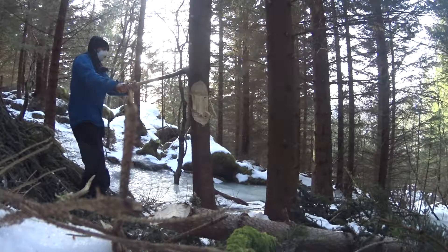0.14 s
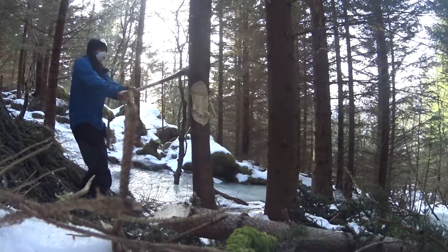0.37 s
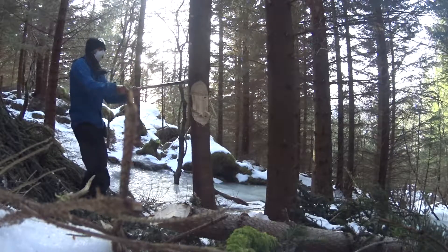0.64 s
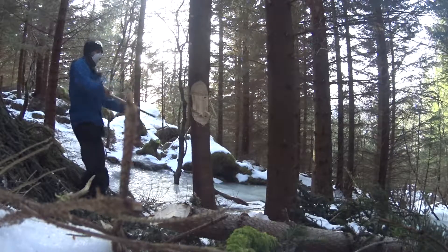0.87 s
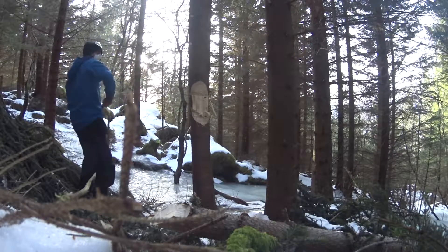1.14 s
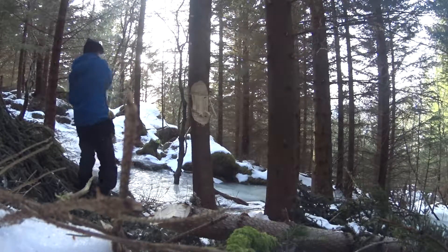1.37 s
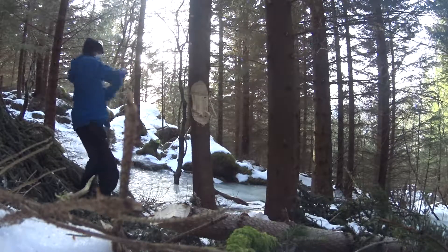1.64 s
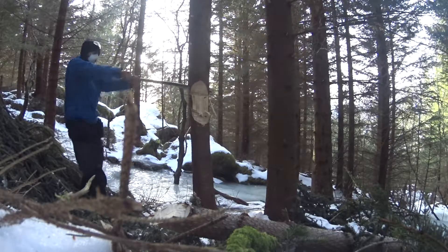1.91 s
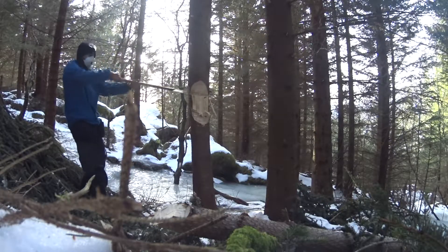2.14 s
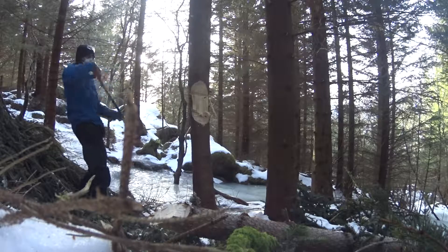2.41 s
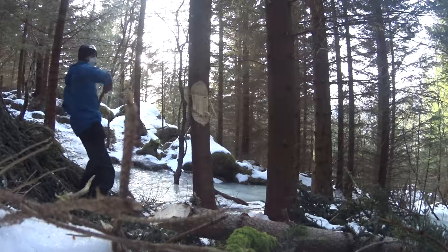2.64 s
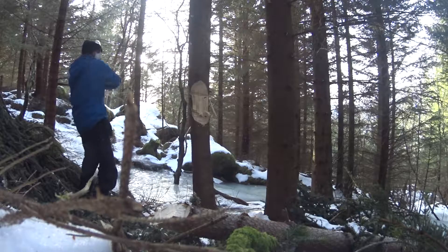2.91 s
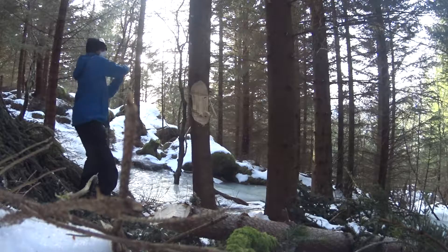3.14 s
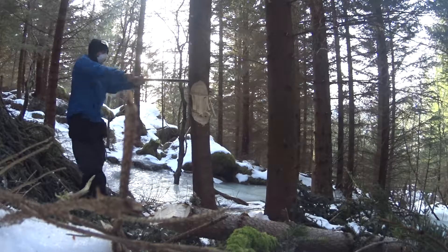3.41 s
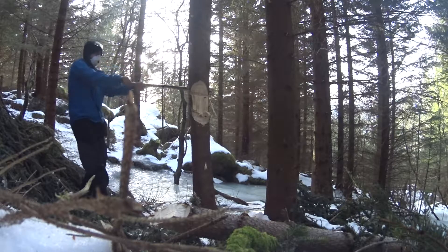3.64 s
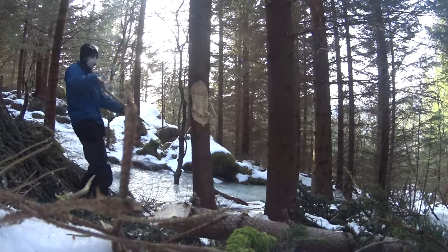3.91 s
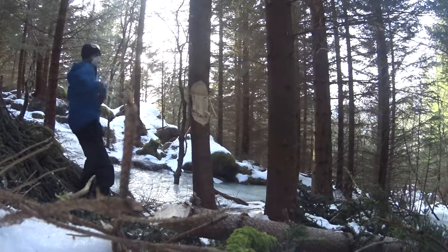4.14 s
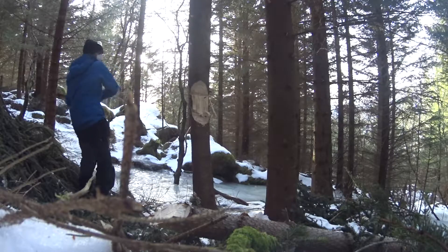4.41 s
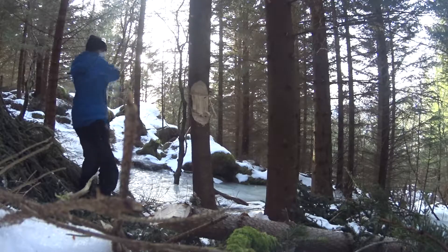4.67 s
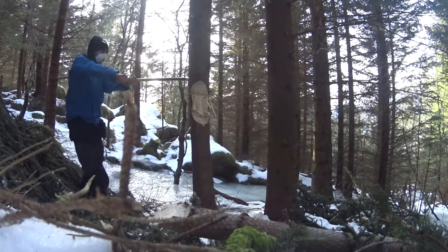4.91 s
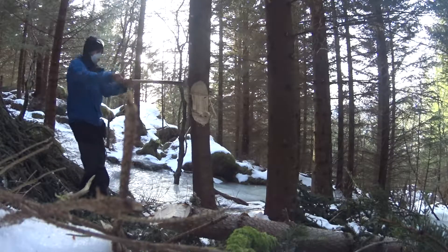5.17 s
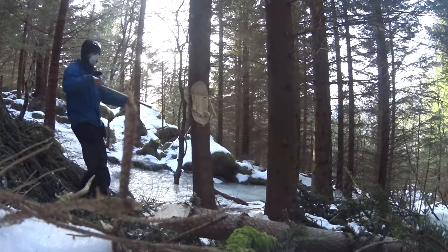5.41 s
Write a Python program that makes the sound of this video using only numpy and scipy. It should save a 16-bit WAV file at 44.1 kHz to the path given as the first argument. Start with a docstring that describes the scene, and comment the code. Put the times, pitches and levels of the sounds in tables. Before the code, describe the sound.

In a quiet forest, the tail of an earlier axe blow fades. Then three loud, sharp chops hit a standing trunk about one and a half seconds apart, each a bright crack with a short, low woody knock and a quick scattered echo. Between them a stiff jacket rustles faintly and small twigs tick. Steady soft microphone hiss runs underneath, in stereo.

```python
"""The echo of an earlier axe blow dies away in a still forest, over steady microphone hiss.
A jacket rustles in small grains of noise; twigs and chips tick, each a short burst of noise.
Then the axe bites into a standing spruce three times, at about 1.8, 3.4 and 4.9 s, with rustles and ticks between.
Each blow is a noise crack of splitting fibres, then a trunk knock of fading sine waves.
The nearest trunks return copies of the crack, and the forest answers with fading noise."""
import sys
import numpy as np
from scipy import signal
from scipy.fft import rfft, irfft
from scipy.io import wavfile

SR = 44100
rng = np.random.default_rng(int(sys.argv[2]) if len(sys.argv) > 2 else 0)


def voltage_ratio(level):
    """Linear amplitude factor for a level in decibels (scalar or array-like)."""
    return 10 ** (np.asarray(level, float) / 20)


def waveform_to_disk(signal):
    """Save audio, clipped to [-1, 1], as 16-bit WAV at the path in sys.argv[1]."""
    frames = np.transpose(np.atleast_2d(signal))
    scaled = np.clip(frames, -1, 1) * 32767
    samples = np.round(scaled).astype(np.int16)
    wavfile.write(sys.argv[1], SR, samples)


N = 244314   # length in samples

# axe blows: start_s, crack_db, brightest_hz, knock_db, knock_tilt_db_per_octave
BLOWS = [(-.25, 13, 4450, -29, 0), (1.84, 10.5, 3440, -29.5, 3.5), (3.3857, 9, 5100, -32.5, -0.5),
         (4.9402, 8, 8400, -30, 2)]
# colour of splitting fibres: pitch_hz, level_db (per Hz)
CRACK_COLOUR = [(350, -60.5), (650, -9.5), (1000, -22), (1400, 1.5), (2000, 2), (2500, 4), (3000, 6),
                (5400, -0.5), (6600, 0), (9500, -6.5), (11000, -3.5), (14500, -3.5)]
# ringing tones of the trunk: pitch_hz, level_db, fade_by_60_db_s
TRUNK_TONES = [(116.5, -2.5, 0.14), (176, -8.5, 0.08), (257.8, 0.5, 0.11), (343.5, -1.5, 0.06),
               (398, 5, 0.06), (460, 10, 0.036), (561, -4, 0.072), (690, -15, 0.044)]
# single echoes off the nearest trunks: delay_s, level_db, left_minus_right_db
NEAR_TRUNKS = [(0.0141, -11.5, -0.5), (0.0236, -25, 2), (.037, -20.5, 1), (0.053, -26.5, 3),
               (0.074, -35.5, -12)]
# colour of the forest echo: pitch_hz, level_db (per Hz)
FOREST_COLOUR = [(35, -47.5), (60, -5), (103, -5.5), (199, -4.5), (391, -11), (497, -16), (543, -16.5),
                 (957, -21.5), (1920, -0.5), (2500, -4), (2910, -4.5), (5600, -5), (10300, -11),
                 (11000, -7), (14300, -48), (22000, -120)]
# how long the forest echo takes to fall by 60 dB: pitch_hz, fade_s
FOREST_FADE = [(60, 0.54), (200, 0.23), (600, 0.66), (1050, 0.56), (1600, 0.5), (2100, 0.43), (2700, 0.5),
               (6000, 0.43), (11000, 0.37)]
# how alike left and right are in the forest echo: pitch_hz, likeness (1 = same, 0 = unrelated)
FOREST_LIKENESS = [(60, 0.66), (500, 0.91), (950, 0.23), (1600, 0.53), (3500, 1), (4100, .3), (5100, 0.76),
                   (6400, 0.12), (11000, 0.29)]
# moves of the jacket: middle_s, half_length_s, level_db, high_hiss_against_rustle_db
RUBS = [(0, .04, -63, -24), (0.388, 0.014, -66.5, -1.5), (0.704, 0.3, -66.5, -6.5),
        (0.98, 0.082, -58.5, -13), (1.174, 0.14, -57, -9.5), (1.434, 0.11, -60.5, -6.5),
        (1.755, 0.28, -62.5, -10), (2.2, 0.43, -67.5, -6.5), (2.448, 0.055, -61, -10.5),
        (2.556, 0.086, -53.5, -9.5), (2.677, 0.079, -60, -13), (2.978, 0.074, -61, -2),
        (3.085, 0.067, -58.5, -4.5), (3.314, 0.19, -63, -6), (3.662, 0.25, -68, -7.5),
        (3.844, 0.064, -63, -8), (4.043, 0.2, -62.5, -10.5), (4.237, 0.14, -60, -8),
        (4.397, 0.019, -59.5, -5), (4.488, 0.08, -63.5, -9), (4.622, 0.073, -65.5, -8.5),
        (4.886, 0.2, -64, -11), (5.22, 0.21, -66, -6), (5.54, 0.13, -60.5, -10)]
# colour of the cloth: pitch_hz, level_db (per Hz)
RUSTLE_COLOUR = [(530, -41), (900, -24), (1540, -8.5), (1820, -27), (2120, -5), (2590, -5.5), (3780, -2.5),
                 (5570, -1.5), (6650, -3), (10200, -9), (11000, -8), (14300, -61), (22000, -120)]
# colour of the microphone hiss: pitch_hz, level_db (per Hz)
HISS_COLOUR = [(12, -42), (20, -6.5), (64, -10), (145, -8), (174, -6.5), (288, -3.5), (439, -3),
               (514, -2.5), (995, -3), (1560, -6), (2940, -10), (3630, -10.5), (11000, -16.5), (14300, -54),
               (22000, -120)]
# how alike left and right are in the hiss: pitch_hz, likeness (-1 = opposite, 1 = same)
HISS_LIKENESS = [(60, 0.97), (130, 0.58), (270, -0.17), (600, -0.57), (1400, -0.68), (2300, 0.13),
                 (3300, 0.77), (4300, -0.84), (5500, 0.68), (7200, -0.95), (11000, 0.25)]
# ticks of twigs and chips: start_s, peak_db, pitch_hz, length_s, wide_snap_share (0 to 1)
TICKS = [(0.493, -45, 7200, .001, .5), (0.516, -34, 5560, 0.0023, 0.88), (0.671, -53, 3500, 0.0074, .01),
         (0.713, -30.5, 4200, 0.0014, 0.74), (0.858, -39.5, 9900, 0.0016, 0.74),
         (2.2, -36.5, 3900, 0.001, 0.6), (2.2214, -56, 5500, .001, .4), (2.289, -36, 7460, 0.0014, 0.92),
         (2.363, -39, 5540, 0.0015, 0.88), (2.796, -24.5, 6000, 0.00025, 0.68),
         (2.8215, -45.5, 5400, 0.00044, .1), (2.965, -37.5, 10500, 0.0034, .05),
         (2.975, -36.5, 10540, 0.0029, .1), (3.0589, -47, 5600, 0.00099, .4),
         (3.0617, -20.5, 5300, 0.00051, 0.54), (3.074, -31.5, 5900, 0.0014, .2),
         (3.1055, -26.5, 10300, 0.00084, 0.32), (3.24, -56.5, 1820, 0.002, .05),
         (3.373, -30, 5600, 0.0011, 0.8), (3.69, -36.5, 3530, 0.0022, .12),
         (4.229, -41, 6000, 0.00048, 0.44), (4.387, -46, 5570, 0.0008, .4),
         (4.4576, -19.5, 4600, 0.00054, 0.51), (4.4632, -34, 5500, 0.00072, 0.76),
         (4.468, -34, 5500, 0.0016, 0.83), (4.861, -38, 5100, 0.0006, 0.43),
         (5.237, -46.5, 4550, 0.00083, 0.48), (5.241, -39, 4500, 0.00091, 0.77)]
# the two ports resonate differently: pitch_hz, left_minus_right_db (before its share is taken)
PORT_BALANCE = [(700, 1), (1900, 0.5), (2250, 14.5), (2600, -4), (3100, 4), (3750, -15), (4500, -2),
                (5800, -7), (6400, -6.5), (7000, 8), (7600, -7), (9100, 6.5), (10000, -15.5), (10800, 1)]
# the ports also differ in phase: pitch_hz, left_lead_radians
PORT_PHASE = [(100, 0.5), (700, 0.1), (1050, -0.2), (1700, 1.1), (2350, -3), (2900, -1.52), (3650, -2.5),
              (4200, -5), (5000, -5.5), (6100, -5.5), (6700, -4.5), (7600, -5.5), (9000, -5.5), (10500, -5)]
# cut of the highest sounds: pitch_hz, gain_db
TOP_CUT = [(10980, 1), (11120, -23), (11600, -24.5), (14000, -67), (15000, -81)]

LEAD = SR // 2   # samples kept before the start, room for the earlier blow
RISE_S, RISE_AT_HZ, RISE_LAW = .0012, 4500, 0.2   # a brighter blow cracks faster
ECHO_DB = -6   # forest answer against the crack
CONTACT_HZ = 680   # the soft wood spreads the push over a millisecond or so
RUB_EDGE = 2.3   # how squarely a rub swells and fades
RESTING_DB = -86   # the cloth at rest
HIGH_HISS_HZ, HIGH_HISS_WIDTH_HZ = 10300, 2200   # thin high part of the cloth sound
HISS_DB = -61   # microphone hiss


def rms_one(x):
    """Scale to an average strength (rms) of 1."""
    return x / np.sqrt(np.mean(x ** 2) + 1e-20)


def at_hz(points, hz):
    """Read a (pitch, value) table in between its points, on a log pitch axis."""
    table = np.array(points)
    return np.interp(np.log(hz + 1), np.log(table[:, 0]), table[:, 1])


def colour(x, points):
    """Filter with the gains of a (pitch_hz, gain_db) table, responding as early as it can (minimum phase)."""
    gain = voltage_ratio(at_hz(points, np.fft.rfftfreq(4096, 1 / SR)))
    cepstrum = irfft(np.log(gain))
    # fold the second half onto the first, so nothing sounds ahead of its cause
    cepstrum[1:2048] *= 2
    cepstrum[2049:] = 0
    response = irfft(np.exp(rfft(cepstrum)))
    return signal.oaconvolve(x, response)[:len(x)]


def resonance(x, hz, width_hz):
    """Let through one band, like something that rings at one pitch; gain about 1 at its peak."""
    r = np.exp(-np.pi * width_hz / SR)
    top = [(1 - r * r) / 2, 0, (r * r - 1) / 2]
    bottom = [1, -2 * r * np.cos(2 * np.pi * hz / SR), r * r]
    return signal.lfilter(top, bottom, x)


def stereo_noise(size, spectrum, likeness):
    """Spectrum of left and right noise whose likeness depends on pitch, and its frequencies."""
    hz = np.fft.rfftfreq(size, 1 / SR)
    mid, side = rfft(rng.standard_normal((2, size)))
    alike = np.clip(at_hz(likeness, hz), -.99, .99)
    pair = np.sqrt(1 + alike) * mid + np.sqrt(1 - alike) * side * [[1], [-1]]
    return voltage_ratio(at_hz(spectrum, hz)) * pair, hz


def drift(rate_hz, size):
    """Slow random wandering of rms 1, made by smoothing noise twice."""
    r = np.exp(-2 * np.pi * rate_hz / SR)
    wander = signal.lfilter([1], [1, -2 * r, r * r], rng.standard_normal(size + 4000))
    return rms_one(wander[4000:])   # leave out the settling


def near_echoes(x):
    """The nearest trunks each return one delayed copy, louder on one side."""
    out = x
    for delay_s, db, pan_db in NEAR_TRUNKS:
        gain = voltage_ratio(db + np.array([[pan_db], [-pan_db]]) / 2)
        out = out + gain * np.roll(x, round(delay_s * SR))
    return out


def forest():
    """Echo of many trunks: clumpy noise that builds up quickly and dies band by band."""
    size = SR * 3 // 4
    noise, hz = stereo_noise(size, FOREST_COLOUR, FOREST_LIKENESS)
    t, out = np.arange(size) / SR, 0
    together = drift(92, size)   # shared by all bands
    for centre in 2 ** np.arange(5, 14, 1 / 3):
        band = np.clip(1 - 3 * np.abs(np.log2((hz + 1) / centre)), 0, 1)
        clumps_db = 0.78 * together + 1.85 * drift(35, size)
        # near trunks answer strongly, far ones keep a faint echo going: the fall slows down
        fade_s = max(at_hz(FOREST_FADE, centre), .05)
        fall_db = 60 * (t / fade_s) ** 0.88
        out = out + irfft(noise * band, size) * voltage_ratio(clumps_db - fall_db)
    out = out * (1 - np.exp(-(t / 0.0025) ** 2))
    return out / np.sqrt(np.mean(np.sum(out ** 2, axis=1)))


def fibre_crack(t, bright_hz):
    """Splitting fibres: uneven noise snaps that swell for a few ms, strongest around one band."""
    rise_s = RISE_S * (RISE_AT_HZ / bright_hz) ** RISE_LAW
    snaps = rng.standard_normal(len(t)) * voltage_ratio(1.33 * rng.exponential(1, len(t)).clip(0, 3))
    snaps *= (t / rise_s) ** 2 * np.exp(-(t / (2.46 * rise_s)) ** 2)   # stops short when the blade sticks
    crack = colour(snaps + 1.36 * resonance(snaps, bright_hz, width_hz=1050), CRACK_COLOUR)
    return crack / np.sqrt(np.sum(crack ** 2))


def trunk_knock(t, tilt_db):
    """The trunk rings in several fading tones; where the blade lands tilts their balance."""
    knock = 0
    for hz, db, fade_s in TRUNK_TONES:
        level_db = db + tilt_db * np.log2(hz / 250) - 60 * t / fade_s
        knock = knock + voltage_ratio(level_db) * np.sin(2 * np.pi * hz * t)
    knock = knock * (1 - np.exp(-(t / 0.00054) ** 2))
    soft_contact = signal.butter(2, CONTACT_HZ, fs=SR, output="sos")
    return signal.sosfilt(soft_contact, knock)


def axe():
    """Fibres snap for a few ms, the trunk knocks just after, the trees around throw the blow back."""
    cracks, knocks = np.zeros(N + LEAD), np.zeros(N + LEAD)
    echo = np.zeros((2, N + LEAD + SR))
    t = np.arange(SR // 4) / SR
    for start_s, crack_db, bright_hz, knock_db, tilt_db in BLOWS:
        at = LEAD + round(start_s * SR)
        cracks[at:at + len(t)] += voltage_ratio(crack_db) * fibre_crack(t, bright_hz)
        bite = at + round(0.0024 * SR)   # the trunk rings once the blade has bitten
        knocks[bite:bite + len(t)] -= voltage_ratio(knock_db) * trunk_knock(t, tilt_db)
        answer = forest()
        answer = answer + .5 * resonance(answer, bright_hz, width_hz=5600)
        echo[:, at:at + answer.shape[1]] += voltage_ratio(crack_db + ECHO_DB) * answer
    no_deep_bass = signal.butter(4, 92, "high", fs=SR, output="sos")   # the trunk radiates none
    blows = near_echoes(cracks) + knocks + echo[:, :N + LEAD]
    return signal.sosfilt(no_deep_bass, blows)[:, LEAD:]


def jacket():
    """Stiff cloth rubs in dense fine grains, one swell for each move of the arms."""
    now = np.arange(N) / SR
    rustle_gain, high_gain = voltage_ratio(RESTING_DB), 0
    for middle_s, half_s, db, high_db in RUBS:
        swell = voltage_ratio(db) * np.exp(-np.abs((now - middle_s) / half_s) ** RUB_EDGE)
        rustle_gain = np.hypot(rustle_gain, swell)
        high_gain = np.hypot(high_gain, voltage_ratio(high_db) * swell)
    grains = rng.standard_normal((4, N)) * voltage_ratio(1.35 * rng.exponential(1, (4, N)).clip(0, 4))
    # grains 0 and 3 reach both sides; grains 1 and 2 are the scattered part, one for each side
    rustle = np.array([colour(grains[0] + .5 * g, RUSTLE_COLOUR) for g in grains[1:3]])
    high = grains[3] + 0.22 * grains[1:3]
    for _ in range(2):
        high = resonance(high, HIGH_HISS_HZ, HIGH_HISS_WIDTH_HZ)
    flicker = voltage_ratio(1.2 * drift(40, N))
    return rms_one(rustle) * rustle_gain * flicker + rms_one(high) * high_gain


def microphone_hiss():
    """Steady coloured noise of the microphone, left and right alike or opposite depending on pitch."""
    spectrum, _ = stereo_noise(N, HISS_COLOUR, HISS_LIKENESS)
    return voltage_ratio(HISS_DB) * rms_one(irfft(spectrum, N))


def ticks():
    """Twigs and chips: short noise bursts in bands, narrower the longer they last, plus a wide snap."""
    out, t = np.zeros(N), np.arange(SR // 20) / SR
    wide = signal.butter(3, 2000, "high", fs=SR, output="sos")
    for start_s, db, hz, length_s, share in TICKS:
        shape = np.exp(-t / max(length_s, .0002)) * (1 - np.exp(-t / (0.33 * length_s)))
        burst = rng.standard_normal(len(t)) * shape
        burst[3] += 2.5   # one fibre parts first
        ring = rms_one(resonance(burst, hz, width_hz=0.43 / length_s))
        snap = rms_one(signal.sosfilt(wide, burst))
        tick = (1 - share) * ring + share * snap
        out[round(start_s * SR):][:len(t)] += voltage_ratio(db) * tick / np.abs(tick).max()
    answer = signal.oaconvolve(out[None], forest())[:, :N]   # the forest answers faintly
    return out + voltage_ratio(-14.0) * answer


def scene():
    """Axe, jacket and ticks together."""
    return axe() + jacket() + ticks()


def ports(x, share):
    """Each side takes the phase of its own port, and a share of that port's colour."""
    hz, side = np.fft.rfftfreq(N, 1 / SR), np.array([[.5], [-.5]])
    gain = voltage_ratio(share * side * at_hz(PORT_BALANCE, hz))
    turn = np.exp(1j * side * at_hz(PORT_PHASE, hz))
    return irfft(rfft(x) * gain * turn, N)


def low_pass(x):
    """Removes everything above the highest recorded frequency."""
    return signal.sosfilt(signal.butter(12, 12260, fs=SR, output="sos"), x)


def record(dry):
    """Sound enters by two unlike ports, the microphone adds its steady hiss, the top is cut."""
    heard = ports(dry, share=0.99) + ports(microphone_hiss(), share=0.073)
    mix = np.array([colour(channel, TOP_CUT) for channel in heard])
    return low_pass(mix)


dry = scene()
out = record(dry)
waveform_to_disk(out)
```